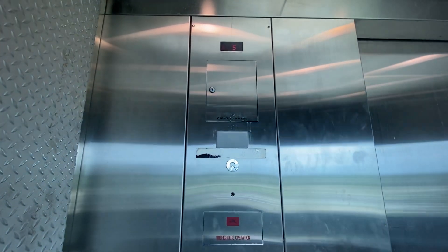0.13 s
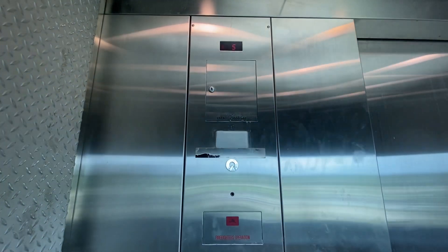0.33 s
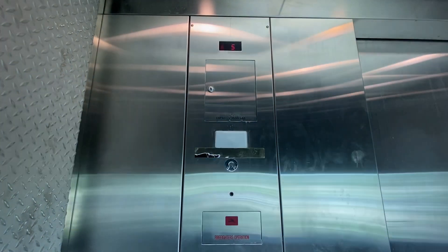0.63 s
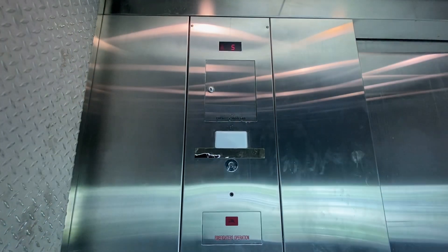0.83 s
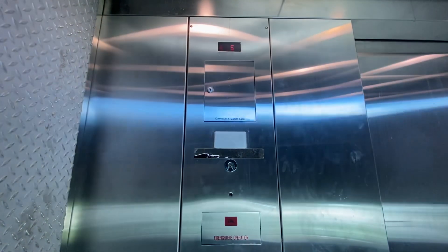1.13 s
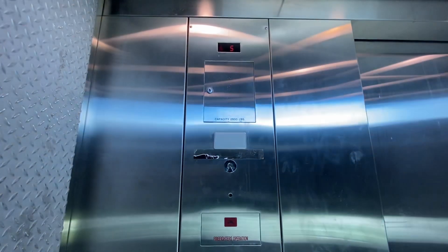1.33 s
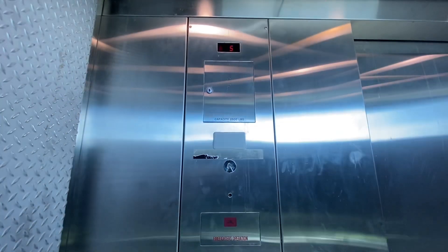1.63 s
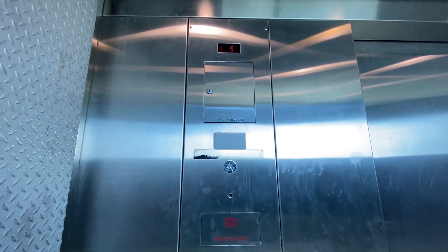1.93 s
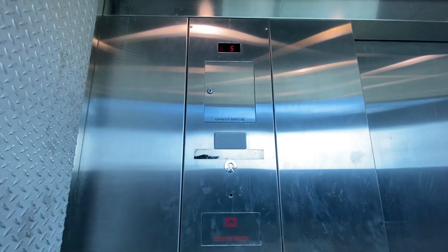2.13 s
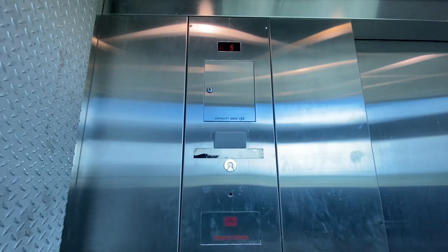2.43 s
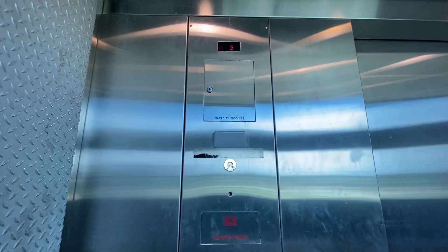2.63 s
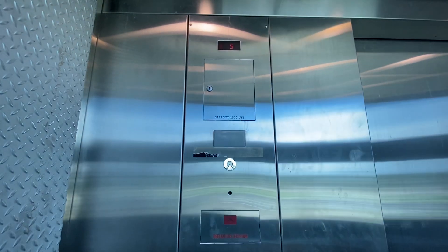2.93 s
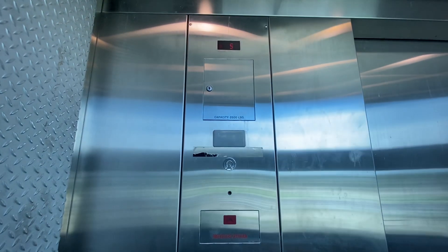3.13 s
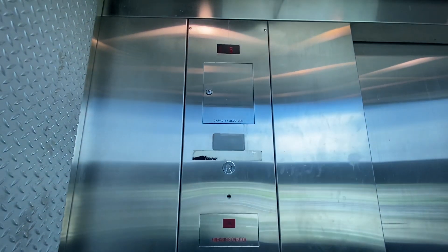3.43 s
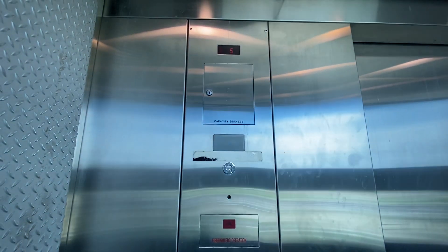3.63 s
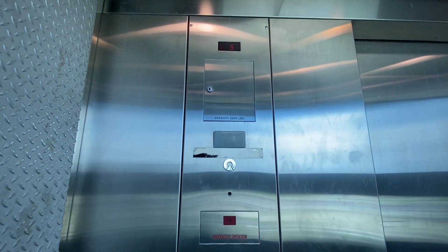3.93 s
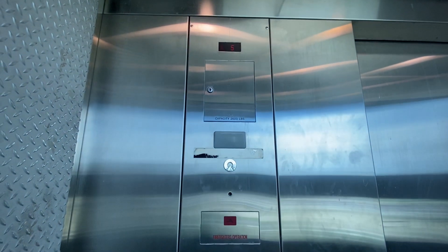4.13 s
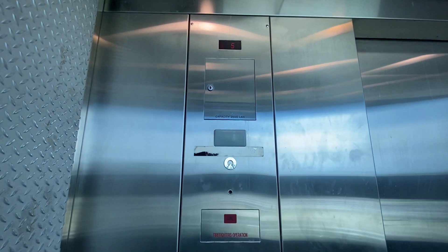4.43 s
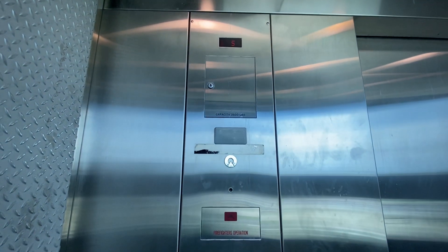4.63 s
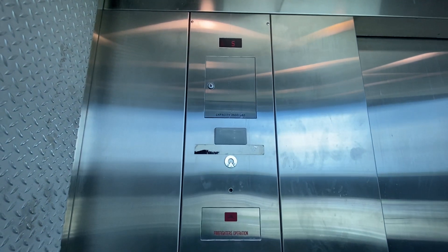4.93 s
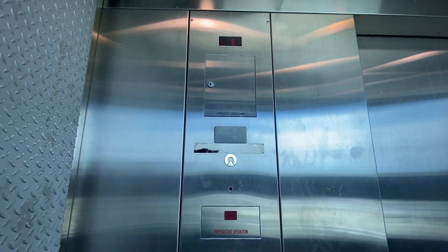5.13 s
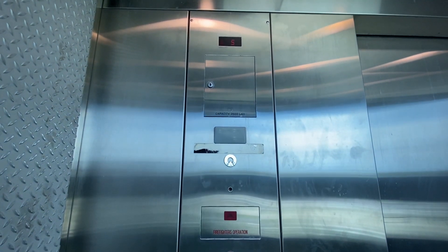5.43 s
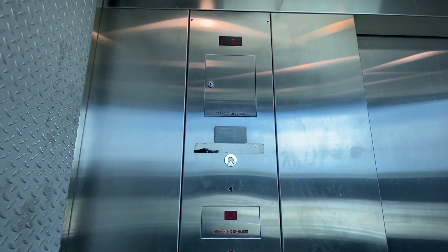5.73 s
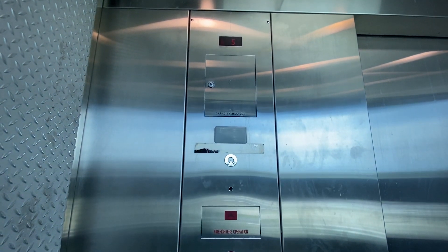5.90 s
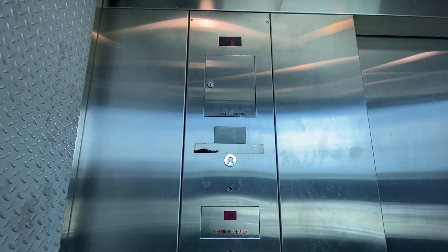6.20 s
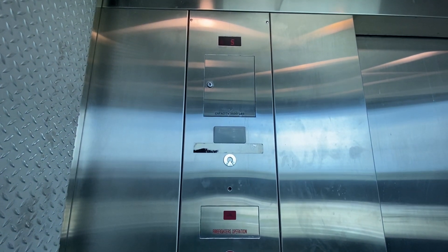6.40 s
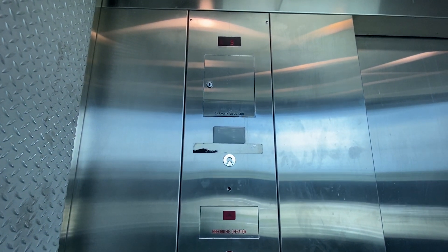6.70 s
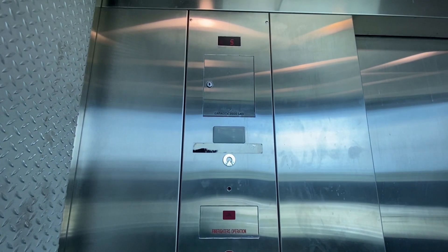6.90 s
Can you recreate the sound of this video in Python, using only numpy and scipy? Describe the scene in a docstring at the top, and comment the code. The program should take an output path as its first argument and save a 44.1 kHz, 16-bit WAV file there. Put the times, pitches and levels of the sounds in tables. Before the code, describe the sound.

Deep throbbing pump hum fills a metal lift car; rail scrapes and a falling hiss mark slowing, then small echoing ticks over quiet ventilation.

```python
"""Parking garage, inside the steel car of a rising hydraulic lift. The pump motor hums at shaft rate and its octave
beats against the mains hum; filtered noise makes the oil rush and the car rumble, wavering lines the pump tones.
A guide shoe scrapes (random slips ring the rail), the valve hisses in a falling band as the car slows,
and sharp ticks echo in the car. The hum sinks towards the air of a fan: duct noise, tones and a fluttering band."""
import sys
import numpy as np
from scipy import signal
from scipy.fft import rfft, irfft
from scipy.io import wavfile
from scipy.ndimage import uniform_filter1d

SR = 44100
rng = np.random.default_rng(int(sys.argv[2]) if len(sys.argv) > 2 else 0)


def generate_wav(signal):
    """Clip the signal to [-1, 1] and save it as 16-bit WAV at the path in sys.argv[1]."""
    frames = np.transpose(np.atleast_2d(signal))
    scaled = np.clip(frames, -1, 1) * 32767
    pcm = np.round(scaled).astype(np.int16)
    wavfile.write(sys.argv[1], SR, pcm)


N = 311346
T = np.arange(N) / SR
FREQS_HZ = np.fft.rfftfreq(2 * N, 1 / SR)

# Motor. Mains hum and octave cancel at BEAT_NULL_S; the shaft speeds up as the car slows and the load eases.
MAINS_HZ, BEAT_NULL_S = 60, 2.08
LOADED_HZ, EASED_HZ, EASE_FROM_S, EASE_TO_S = 58.68, 58.93, 3.2, 3.6
# Shaft hum: (time [s], level [dB])
HUM_LEVEL = [(0.05, -19), (1.06, -16.5), (3.04, -20.5), (3.72, -24.5), (4.0, -23.5), (4.11, -29.5),
             (4.21, -23), (4.25, -31), (4.31, -22.5), (4.34, -31), (4.38, -24.5), (4.56, -29),
             (4.68, -24.5), (4.72, -31), (4.87, -32), (4.93, -28), (5.01, -31.5), (5.14, -28.5),
             (5.42, -31), (5.45, -40), (5.59, -38.5), (5.63, -45), (5.8, -31.5), (5.98, -39.5), (6.02, -36),
             (6.66, -32), (6.85, -42), (7.03, -30)]
# Octave of the shaft: (time [s], level [dB])
OCTAVE_LEVEL = [(0.05, -40), (0.4, -40.5), (0.75, -38.5), (1.1, -40.5), (1.5, -41.5), (1.9, -38),
                (2.28, -37.5), (2.66, -35.5), (3.05, -35.5), (3.4, -36.5), (4.1, -40), (4.3, -38.5),
                (5.0, -46), (5.3, -42), (5.55, -48), (5.95, -52), (6.2, -45.5), (6.38, -61), (6.57, -39.5),
                (6.8, -52.5)]
# Magnetic hum at twice the mains rate: (time [s], share of the octave's amplitude)
MAGNETIC_SHARE = [(0.6, 0.55), (1.15, 0.22), (1.65, 1), (3.2, 1), (3.45, 0.15)]
# Overtone at four times the shaft rate: (time [s], level [dB])
FOURTH_LEVEL = [(0.05, -48), (0.69, -47.5), (1.4, -61), (1.9, -51), (2.4, -51), (3.45, -42), (4.09, -53.5),
                (4.55, -49.5), (5.0, -55.5), (5.25, -53.5), (5.8, -59.5), (7.0, -53.5)]
# The hum leans left while strong, centres as it fades, and reaches the left ear later.
LEAN_LIMIT_DB, LEAN_KNEE_DB, LEFT_LAG_S = 9.0, -32.5, 0.0016
# Flutter once the load eases, as a share of the hum's strength
FLUTTER_SHARE, FLUTTER_PER_S = 0.15, 45

# Pump. Flow is relative to full hum; one surge as the car reaches full speed.
FULL_HUM_DB, FLOW_DB, FLOW_DB_PER_HUM_DB = -18, -49, 0.95
SURGE_DB, SURGE_S, SURGE_WIDTH_S = 3, 1.02, 0.3
CHURN_DB, CHURN_SLOW_PER_S, CHURN_FAST_PER_S = 0.55, 18, 130
# Spectrum of the oil rush: (frequency [Hz], density [dB per Hz])
OIL_SPECTRUM = [(130, -51), (220, -16), (244, -15), (262, -10.5), (322, -3.5), (404, -13.5), (449, -8.5),
                (613, -16.5), (693, -13), (839, -9), (1290, -20.5), (2000, -17), (3250, -28),
                (12800, -36.5), (14000, -40)]
# Resonances of the oil line: (frequency [Hz], width [Hz], lift [dB])
OIL_MODES = [(1176, 60, 4), (1556, 40, 0), (1680, 37, 2.5), (1910, 59, 3), (2430, 47, 1.5),
             (3750, 140, 1.5), (4840, 150, 4), (5240, 350, 0.5), (6170, 150, 5)]
# Pump tones in the pipes: (frequency [Hz], level [dB re flow])
PUMP_TONES = [(176.3, -11.5), (329, -12.5), (352.5, -12.5), (384, -22.5), (411, -18), (498, -23),
              (529, -15), (587, -19), (648, -23), (770, -28), (798, -18.5), (822, -20), (854, -22),
              (880, -20.5), (920, -19.5), (942, -16.5), (966, -16)]
PIPE_WAVER_SHARE = 0.32
# Pump tones that swell as the car passes: (time [s], half length [s], frequency [Hz], level [dB])
TONE_SWELLS = [(0.47, 0.23, 141.5, -43), (1.05, 0.26, 141.5, -39.5), (2.39, 0.21, 141.5, -37.5),
               (3.055, 0.22, 141.5, -37.5), (6.55, 0.096, 141.5, -47.5), (6.9, 0.14, 141.5, -49.5),
               (1.35, 0.5, 164.5, -51), (2.24, 0.21, 293.4, -48.5), (1.07, 0.17, 441.5, -49),
               (1.5, 0.47, 441.5, -55.5), (1.1, 1.2, 470, -56.5), (1.15, 0.49, 676, -56.5),
               (1.05, 1.05, 706, -57.5), (3.36, 0.14, 428, -50), (3.42, 0.27, 822, -58)]
SWELL_WAVER_SHARE = 0.13

# Spectrum of the car's rumble: (frequency [Hz], density [dB per Hz])
RUMBLE_SPECTRUM = [(15, -1.5), (30, -14), (48, 3.5), (58, 1), (72, 2), (98, 3.5), (125, -0.5), (160, -6.5),
                   (200, -17.5), (330, -13), (450, -61.5)]
# Rumble, jolted by slowing: (time [s], level [dB])
RUMBLE_LEVEL = [(0.05, -40), (2.95, -40.5), (3.25, -33), (3.9, -39.5), (5.3, -40.5), (5.55, -49.5),
                (6.05, -46.5), (6.6, -42.5), (7.0, -43)]

# Valve hiss
VALVE_DB, VALVE_S, VALVE_RISE_S, VALVE_HOLD_S, VALVE_T60_S = -63, 2.45, 0.69, 0.61, 1.55
VALVE_START_HZ, VALVE_END_HZ, VALVE_GLIDE_S = 15420, 6790, 0.52

# Guide shoe scrapes: (start [s], rise [s], hold [s], level [dB], top of treble [Hz])
SCRAPES = [(0.96, 0.045, 0.015, -50, 3000), (2.4, 0.07, 0.03, -49, 2000),
           (3.066, 0.048, 0.034, -45.5, 1100), (3.092, 0.13, 0.035, -43.5, 11000),
           (3.313, 0.077, 0.038, -44, 11000)]
# Spectrum of the scraped rail: (frequency [Hz], density [dB per Hz])
RAIL_SPECTRUM = [(110, -69), (180, -60), (237, -3), (290, -4.5), (387, -2.5), (432, -2.5), (693, -12),
                 (1050, -14), (1340, -14.5), (1920, -18), (3380, -23.5), (6400, -27), (14000, -37)]
# Resonances of the guide rail: (frequency [Hz], width [Hz], lift [dB])
RAIL_MODES = [(1005, 33, -1), (1640, 40, 3), (1880, 40, 7), (2220, 51, 7), (2390, 44, 11.5), (2583, 56, 13),
              (2920, 62, 8), (3230, 50, 7), (3570, 36, 11.5), (3920, 60, 13), (4140, 50, 9),
              (4600, 67, 11.5), (4900, 60, 7), (5200, 50, 10), (5800, 60, 0), (6100, 70, 15), (6600, 98, 8),
              (7480, 90, 7)]
SCRAPE_T60_S, SLIPS_PER_S = 0.68, 900
# Spread of the resonances between scrapes
RAIL_DETUNE_SHARE, RAIL_SPREAD_DB = .005, 1.5

# Ticks: (time [s], snap [dB], knock [dB], ring frequency [Hz], ring [dB], snap treble lift [dB],
#         left minus right [dB])
CAR_TICKS = [(2.0877, -39, -72, 6500, -59, -5, 1.5), (2.514, -68, -57, 3830, -74, -6, 0),
             (3.445, -58, -79, 11100, -77, -4, 4), (3.814, -73, -58, 3300, -72, 0, 2),
             (4.293, -93, -69, 3680, -68, 0, 0), (4.354, -59, -59, 4320, -65, -7, 1),
             (4.6425, -59.5, -65, 3470, -66, 0, 0), (5.002, -59, -61, 2120, -61, 4, 2),
             (5.012, -75, -54, 2130, -63, 0, -3), (5.031, -82, -57, 2150, -64, 0, 0),
             (5.055, -87, -58, 1120, -57, 0, 0), (5.1915, -62.5, -60, 3500, -71, 6, 0),
             (6.5913, -90, -55, 3320, -84, 0, -1)]
# Spectrum of the snap: (frequency [Hz], density [dB per Hz])
SNAP_SPECTRUM = [(1000, -10), (1700, -14), (2600, 0.5), (3150, -19), (3700, -1), (4600, -1.5), (5700, -7),
                 (6900, 2.5), (7500, -1.5), (9000, 5), (10200, 1.5), (11500, 2), (14000, -4)]
# Spectrum of the knock: (frequency [Hz], density [dB per Hz])
KNOCK_SPECTRUM = [(200, -30), (600, 19), (1200, 11.5), (1700, 9.5), (2400, 4.5), (3200, 3.5), (5000, -2.5),
                  (9000, -19), (14000, -43)]
# Direct sound against the echo
TICK_DIRECT_DB, TICK_RING_WIDTH_HZ, TICK_TREBLE_HZ, CAR_T60_S = -12.5, 900, 10500, 0.48

# Spectrum of the fan's air: (frequency [Hz], density [dB per Hz])
FAN_SPECTRUM = [(130, -53), (230, 1.5), (310, -3), (420, -5), (540, -10), (660, -8), (1000, -12.5),
                (1330, -19), (2400, -22), (4400, -25.5), (6500, -30.5), (9700, -43.5), (11000, -42.5),
                (14000, -41)]
# Resonances of the fan duct: (frequency [Hz], width [Hz], lift [dB])
DUCT_MODES = [(339, 24, 7.5), (680, 46, 5), (990, 250, 6), (1513, 480, 6.5), (2410, 850, 6), (5200, 560, 5),
              (6660, 500, 5), (8950, 1600, 9)]
# Blade and motor tones of the fan: (frequency [Hz], level [dB])
FAN_TONES = [(330, -66.5), (427, -67.5), (641, -70.5), (680, -69.5), (813, -72.5), (1022, -76),
             (1061, -71.5), (1081, -71), (1530, -79.5), (1680, -81), (2710, -86)]
# Fluttering band, loudest at one height of the car; the air swells there too.
FAN_AIR_DB, FAN_SWELL_DB = -54.0, 2
WARBLE_DB, WARBLE_S, WARBLE_PASS_S = -61.5, 4.9, 0.68
WARBLE_HZ, WARBLE_WIDTH_HZ, WARBLE_DEPTH_DB, WARBLE_PER_S = 1030, 110, 3, 28

# Likeness of the two ears: (frequency [Hz], correlation)
EAR_CORRELATION = [(60, 1), (150, 0.78), (300, 0.58), (600, -0.24), (1400, -0.13), (3000, 0.049),
                   (9000, -0.0034), (13000, 0.95)]
TOP_HZ = 13700


def motor():
    """Shaft hum; its octave slips behind the magnetic hum at twice the mains rate, so the two throb."""
    eased = np.interp(T, [EASE_FROM_S, EASE_TO_S], [0, 1])
    shaft_hz = LOADED_HZ + (EASED_HZ - LOADED_HZ) * eased
    turn_rad = 2 * np.pi * np.cumsum(shaft_hz) / SR
    turn_rad -= np.interp(BEAT_NULL_S, T, turn_rad)
    side_db = hum_lean_db()

    wobble = walk(FLUTTER_PER_S) + 1j * walk(FLUTTER_PER_S)
    flutter = 1 + FLUTTER_SHARE * eased * wobble
    lag_rad = 2 * np.pi * shaft_hz * LEFT_LAG_S * np.array([[1], [0]])
    wave = np.imag(flutter * np.exp(1j * (turn_rad - lag_rad)))
    hum = np.sqrt(2) * undb(curve(HUM_LEVEL)) * wave

    # deepest throb at equal strength
    magnetic = curve(MAGNETIC_SHARE) * np.cos(4 * np.pi * MAINS_HZ * (T - BEAT_NULL_S))
    throb = np.sqrt(2) * undb(curve(OCTAVE_LEVEL)) * (np.cos(2 * turn_rad) - magnetic)
    fourth = tone(4 * shaft_hz, waver=0.079, rate_per_s=9.9) * undb(curve(FOURTH_LEVEL))
    return (hum + fourth) * lean(side_db) + throb * lean(1.54 * side_db)


def pump():
    """Oil rushes through the pipes in uneven lumps; rush and pump tones follow the flow."""
    surge_db = SURGE_DB * passing(SURGE_S, SURGE_WIDTH_S) ** 2
    flow_db = FLOW_DB_PER_HUM_DB * (hum_trend_db() - FULL_HUM_DB) + surge_db
    oil_db = over_hz(OIL_SPECTRUM) + resonances_db(OIL_MODES)
    rush = in_car(rng.standard_normal(N), undb(oil_db))
    rush = rush * undb(CHURN_DB * (walk(CHURN_SLOW_PER_S) + walk(CHURN_FAST_PER_S)))
    # slow oil is less turbulent, so the rush also dulls
    treble = shape(rush, 1 - 1 / (1 + (FREQS_HZ / 4500) ** 2))
    treble_gain = undb(np.minimum(2.6 * (flow_db + 3.5), 0))
    rush = rush - treble * (1 - treble_gain)
    pipes = tones(PUMP_TONES, waver=PIPE_WAVER_SHARE, rate_per_s=5.13, bass_lean_db=20.0)
    # the tones take only half the surge
    pipes = pipes * undb(-0.5 * surge_db)
    return (undb(-1.0) * rush * lean(0.98) + pipes) * undb(FLOW_DB + flow_db)


def standing_waves():
    """Single pump tones swell as the car rises through spots where they stand in the hoistway."""
    out = 0
    for time_s, half_s, hz, db in TONE_SWELLS:
        line = tones([(hz, db)], waver=SWELL_WAVER_SHARE, rate_per_s=6, bass_lean_db=16)
        out = out + line * np.exp(-((T - time_s) / half_s) ** 2)
    return out


def rumble():
    """Floor and walls shake as the car travels, most when it slows: shaped noise."""
    body = unit(shape(stereo_noise(), undb(over_hz(RUMBLE_SPECTRUM))))
    return body * undb(curve(RUMBLE_LEVEL)) * lean(1.5 * hum_lean_db())


def valve():
    """A jet of oil hisses: a noise band whose centre falls as the flow is throttled."""
    opening = np.exp(-np.maximum(T - VALVE_S, 0) / VALVE_GLIDE_S)
    centre_hz = VALVE_END_HZ + (VALVE_START_HZ - VALVE_END_HZ) * opening
    low_noise = shape(rng.standard_normal(N), 1 / (1 + (FREQS_HZ / 1900) ** 2))
    jet = low_noise * np.cos(2 * np.pi * np.cumsum(centre_hz) / SR)
    level = undb(VALVE_DB) * envelope(VALVE_S, VALVE_RISE_S, VALVE_HOLD_S, VALVE_T60_S)
    return in_car(jet, 1) * level


def guide_shoe():
    """Random grip-and-slip pulses; each scrape meets the rail at a new spot and rings it differently."""
    out = 0
    for start_s, rise_s, hold_s, db, top_hz in SCRAPES:
        modes = []
        for hz, width_hz, lift_db in RAIL_MODES:
            detune, spread = rng.standard_normal(2)
            modes.append((hz * (1 + RAIL_DETUNE_SHARE * detune), width_hz, lift_db + RAIL_SPREAD_DB * spread))
        slips = rng.standard_normal(N) * (rng.random(N) < SLIPS_PER_S / SR)
        rail = undb(over_hz(RAIL_SPECTRUM) + resonances_db(modes))
        ring = in_car(slips, rail / np.hypot(1, (FREQS_HZ / top_hz) ** 2))
        out = out + ring * undb(db) * envelope(start_s, rise_s, hold_s, SCRAPE_T60_S)
    grip_db = 1.2 * walk(rate_per_s=110)
    return out * undb(grip_db) * lean(0.92)


def ticks():
    """Bright snap, duller knock and brief ring; each arrives directly, then echoes between the walls."""
    out = np.zeros((2, N))
    head, arrival = int(.03 * SR), int(.001 * SR)
    treble = 1 / (1 + (TICK_TREBLE_HZ / np.maximum(FREQS_HZ, 1)) ** 8)
    for time_s, snap_db, knock_db, ring_hz, ring_db, treble_db, side_db in CAR_TICKS:
        start = int(time_s * SR)
        paths = wall_echo(CAR_T60_S)
        paths[:, arrival] += undb(TICK_DIRECT_DB)
        snap = undb(over_hz(SNAP_SPECTRUM) + treble_db * treble)
        knock = undb(over_hz(KNOCK_SPECTRUM))
        ring = 1 / (1 + 2j * (FREQS_HZ - ring_hz) / TICK_RING_WIDTH_HZ) ** 2
        for colour, db in (snap, snap_db), (knock, knock_db), (ring, ring_db):
            part = shape(paths, colour)
            # levels are rms over the first 30 ms
            part = part / np.std(part[:, :head].mean(axis=0))
            out[:, start:] += undb(db) * lean(side_db) * part[:, :N - start]
    return out


def fan():
    """Air through a resonant duct, with blade and motor tones and one band that flutters."""
    air_colour = undb(over_hz(FAN_SPECTRUM) + resonances_db(DUCT_MODES))
    air = in_car(rng.standard_normal(N), air_colour) * undb(.5 * walk(12))
    nearness = passing(WARBLE_S, WARBLE_PASS_S)
    air_db = FAN_AIR_DB + FAN_SWELL_DB * nearness ** 2
    band_gain = 1 / (1 + (2 * (FREQS_HZ - WARBLE_HZ) / WARBLE_WIDTH_HZ) ** 4)
    band = in_car(rng.standard_normal(N), band_gain)
    warble = band * undb(WARBLE_DB + WARBLE_DEPTH_DB * walk(WARBLE_PER_S)) * nearness
    lines = tones(FAN_TONES, waver=0.59, rate_per_s=14, bass_lean_db=10)
    return undb(air_db) * air + warble + lines


def hum_trend_db():
    """Hum level averaged over half a second."""
    return uniform_filter1d(curve(HUM_LEVEL), size=SR // 2)


def hum_lean_db():
    """Left minus right: near the limit while the hum is strong, fading below the knee."""
    return LEAN_LIMIT_DB / (1 + undb(LEAN_KNEE_DB - hum_trend_db()) ** 2)


def tone(hz, waver, rate_per_s):
    """Line of rms 1 whose strength and phase waver."""
    turn_rad = 2 * np.pi * (np.cumsum(hz * np.ones(N)) / SR + rng.random())
    swing = 1 + waver * (walk(rate_per_s) + 1j * walk(rate_per_s))
    return np.real(swing * np.exp(1j * turn_rad)) * np.sqrt(2 / (1 + 2 * waver ** 2))


def tones(table, waver, rate_per_s, bass_lean_db):
    """Wavering lines; low ones lean to one side, higher ones reach each ear by different paths."""
    out = 0
    for hz, db in table:
        apart = min(hz / 700, 1)
        mid = tone(hz, waver, rate_per_s)
        side = apart ** 2 * tone(hz, waver, rate_per_s)
        pair = mid + side * np.array([[1], [-1]])
        out = out + undb(db) * pair * lean(bass_lean_db * (1 - apart))
    return out


def in_car(x, gain):
    """Source echoing up the concrete hoistway, then coloured by a gain per frequency; rms 1."""
    hoistway = wall_echo(t60_s=.8)
    echoed = irfft(rfft(x) * rfft(hoistway), N)
    return unit(shape(echoed, gain))


def wall_echo(t60_s):
    """Dense reflections between hard walls as decaying noise; energy 1."""
    echo = stereo_noise() * undb(-60 * T / t60_s)
    build_up = 1 - np.exp(-T / .0008)
    return unit(echo * build_up) / np.sqrt(N)


def stereo_noise():
    """Noise pair from mid and side, with the ear-to-ear correlation of the table."""
    alike = np.clip(over_hz(EAR_CORRELATION), -.99, .99)
    gains = np.sqrt([np.ones_like(alike), (1 - alike) / (1 + alike)])
    mid, side = shape(rng.standard_normal((2, N)), gains)
    return np.array([mid + side, mid - side])


def walk(rate_per_s):
    """Random levels held 1 / rate and slewed twice; spread near 1."""
    hold = int(SR / rate_per_s)
    held = rng.standard_normal(1024)[np.arange(N) // hold % 1024]
    return np.sqrt(2) * uniform_filter1d(uniform_filter1d(held, hold), hold)


def passing(at_s, width_s):
    """One over the distance to a spot that the car passes; 1 when nearest."""
    return 1 / np.hypot(1, (T - at_s) / width_s)


def envelope(start_s, rise_s, hold_s, t60_s):
    """Straight rise to 1, hold, then a fall of 60 dB in t60_s."""
    fall_db = -60 * np.maximum(T - start_s - rise_s - hold_s, 0) / t60_s
    return np.clip((T - start_s) / rise_s, 0, 1) * undb(fall_db)


def resonances_db(table):
    """Summed lift around each resonance."""
    return sum(db / (1 + (2 * (FREQS_HZ - hz) / width_hz) ** 2) for hz, width_hz, db in table)


def lean(db):
    """Left and right gains, left minus right in dB, with a mean of 1."""
    gains = undb(np.array([db, -db]) / 2).reshape(2, -1)
    return gains / gains.mean(axis=0)


def unit(pair):
    """Scale a stereo pair so that its middle has rms 1."""
    return pair / np.std(pair.mean(axis=0))


def shape(x, gain):
    """Filter with a gain for each frequency."""
    return irfft(rfft(x, 2 * N) * gain)[..., :N]


def over_hz(points):
    """Points joined by straight lines on a log-frequency axis."""
    hz, value = np.transpose(points)
    return np.interp(np.log(np.maximum(FREQS_HZ, 1)), np.log(hz), value)


def curve(table):
    """Points joined by straight lines in time."""
    return np.interp(T, *np.transpose(table))


def undb(db):
    """Decibels to gain."""
    return 10 ** (np.asarray(db) / 20)


def scene():
    """Everything heard in the car."""
    return motor() + pump() + standing_waves() + rumble() + valve() + guide_shoe() + ticks() + fan()


def record(dry):
    """Steep elliptic low-pass at TOP_HZ."""
    low_pass = signal.ellip(10, .2, 70, TOP_HZ, fs=SR, output="sos")
    return signal.sosfilt(low_pass, dry)


dry = scene()
out = record(dry)
generate_wav(out)
```